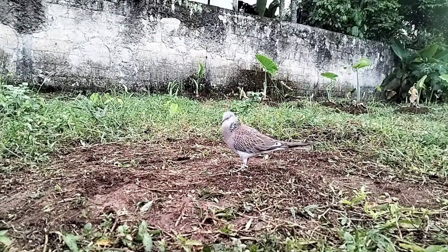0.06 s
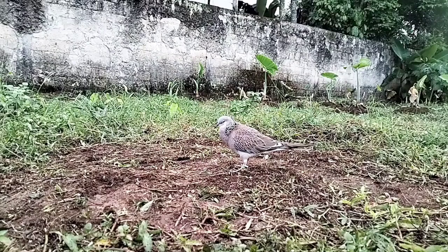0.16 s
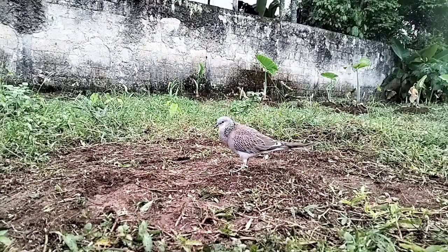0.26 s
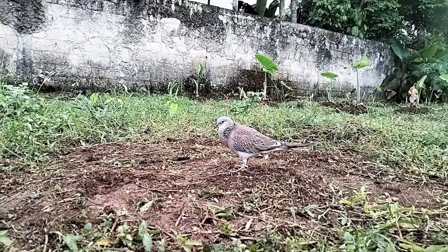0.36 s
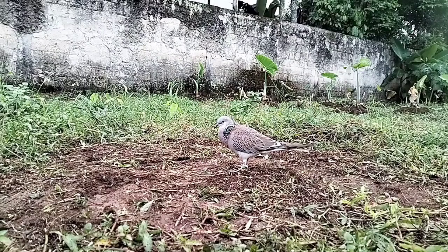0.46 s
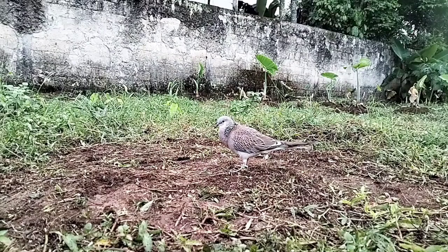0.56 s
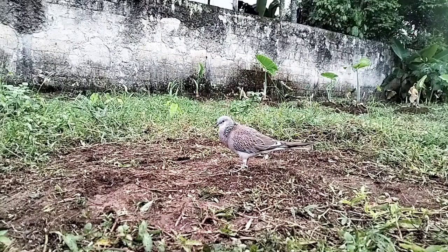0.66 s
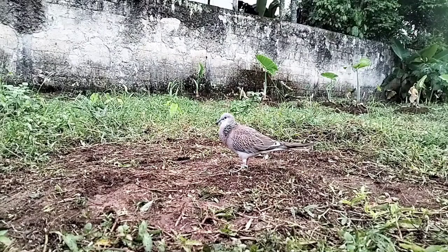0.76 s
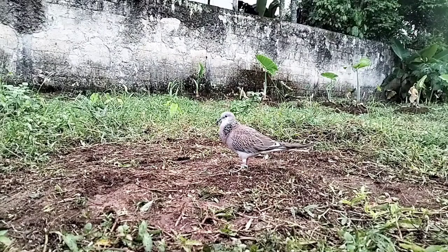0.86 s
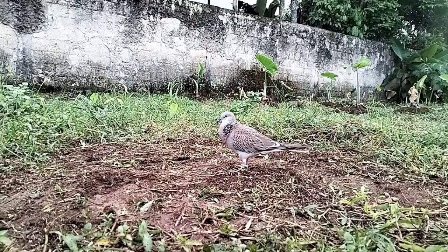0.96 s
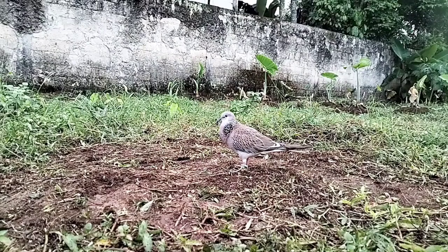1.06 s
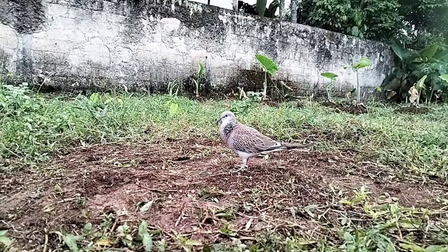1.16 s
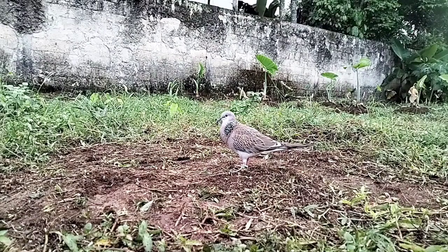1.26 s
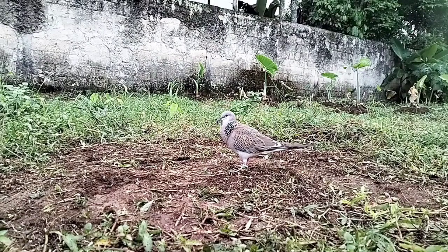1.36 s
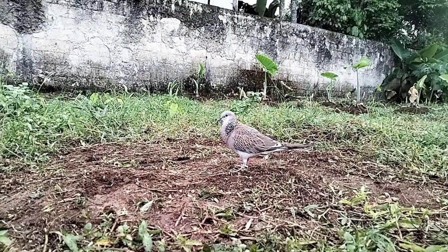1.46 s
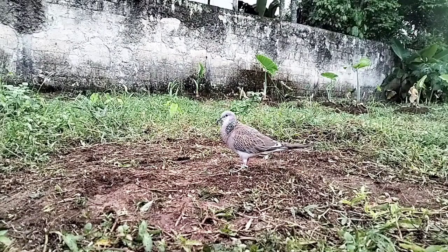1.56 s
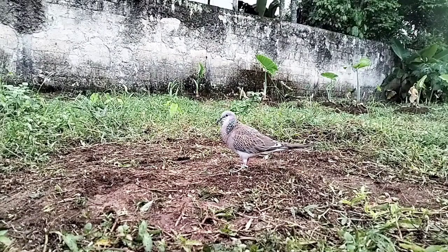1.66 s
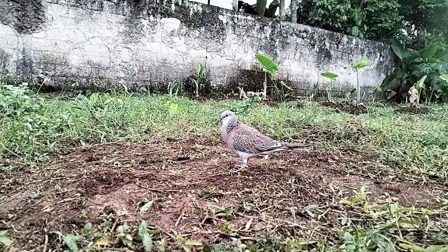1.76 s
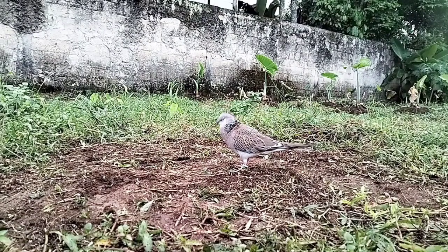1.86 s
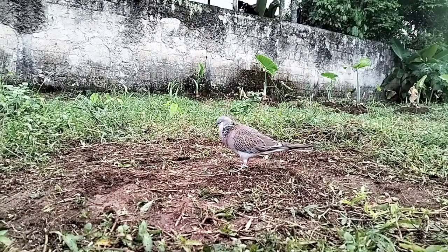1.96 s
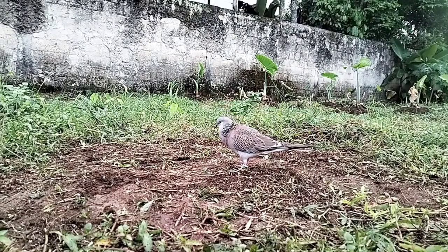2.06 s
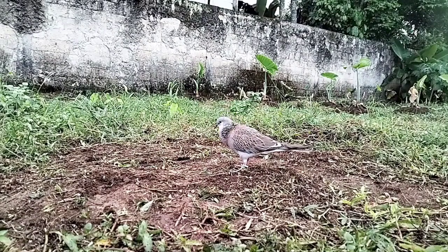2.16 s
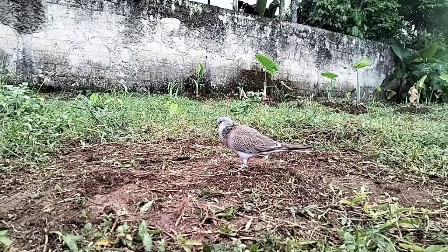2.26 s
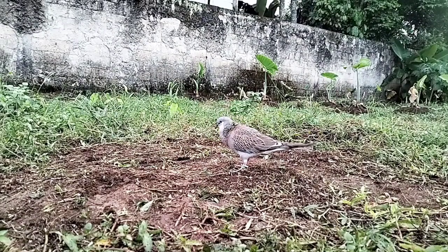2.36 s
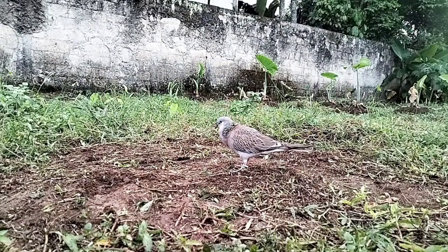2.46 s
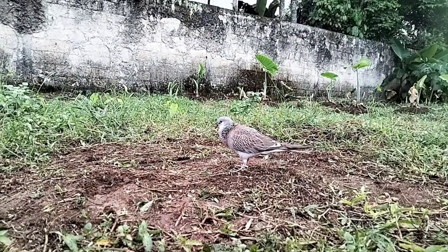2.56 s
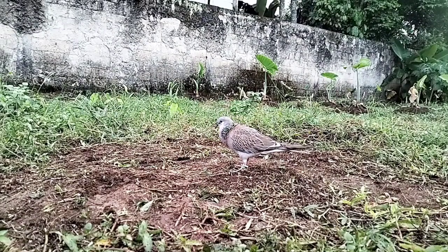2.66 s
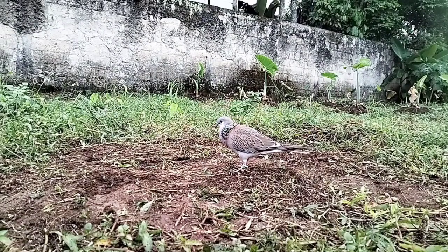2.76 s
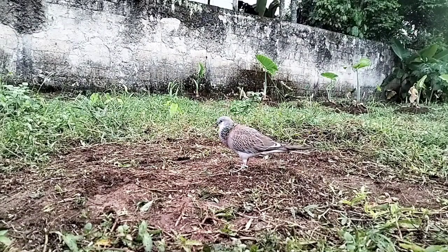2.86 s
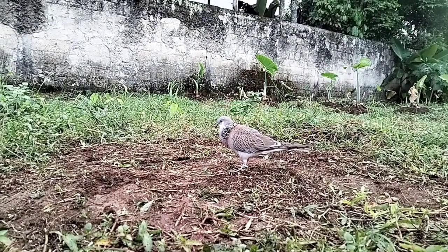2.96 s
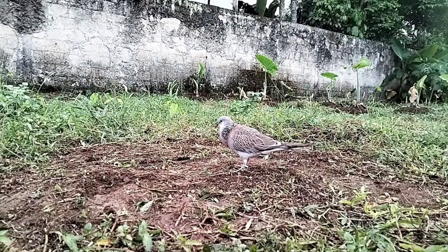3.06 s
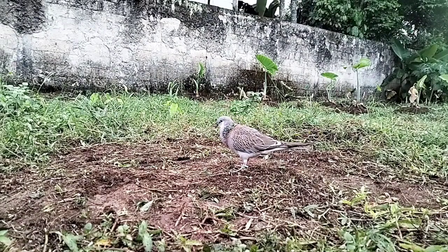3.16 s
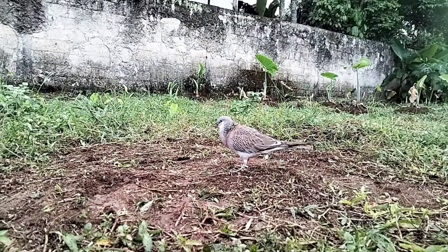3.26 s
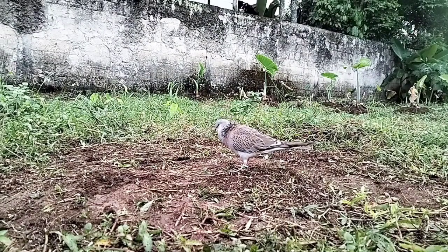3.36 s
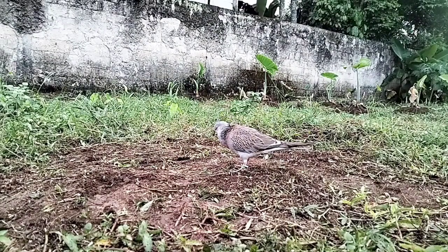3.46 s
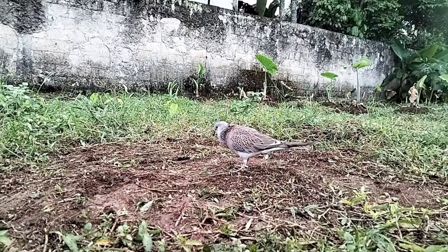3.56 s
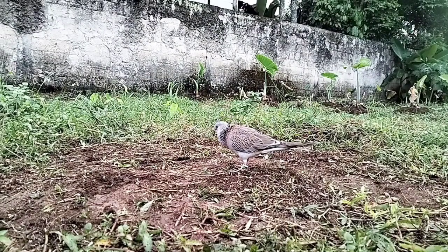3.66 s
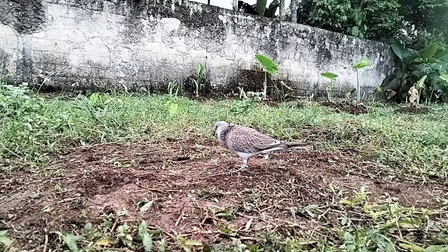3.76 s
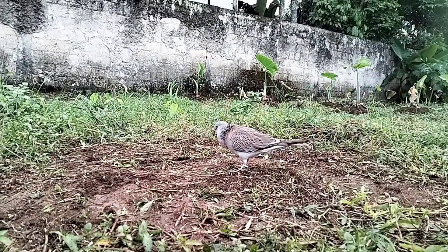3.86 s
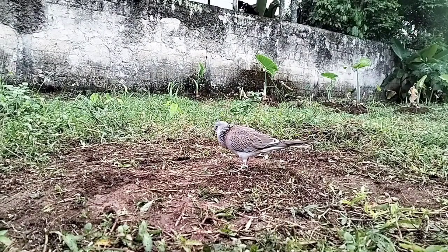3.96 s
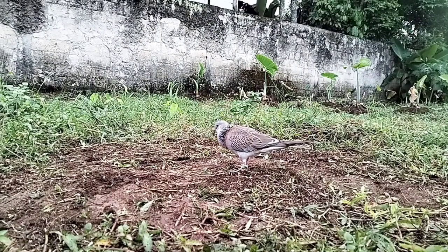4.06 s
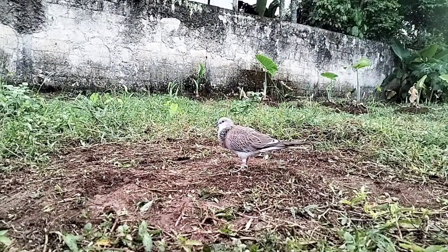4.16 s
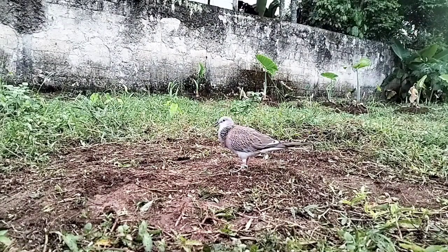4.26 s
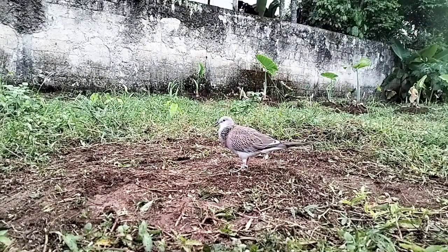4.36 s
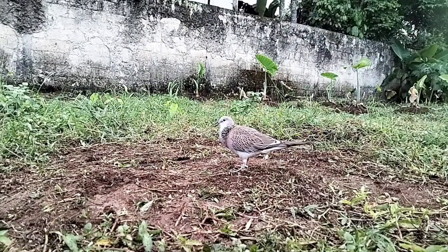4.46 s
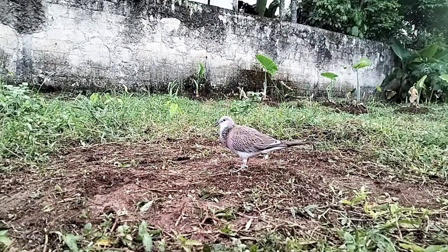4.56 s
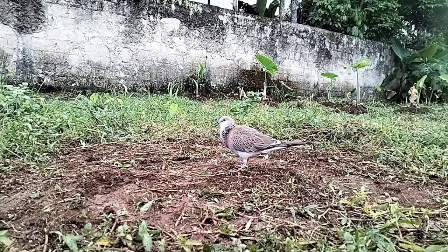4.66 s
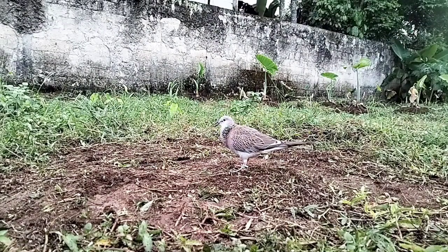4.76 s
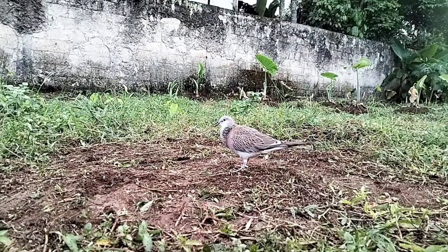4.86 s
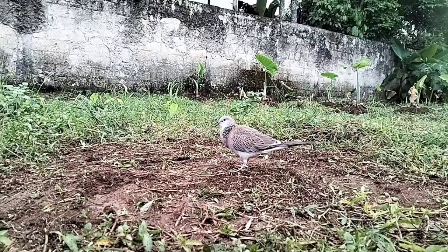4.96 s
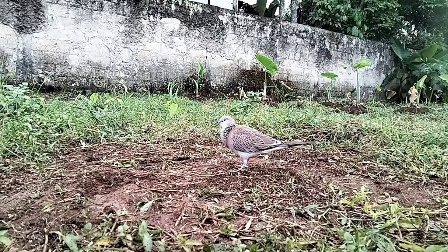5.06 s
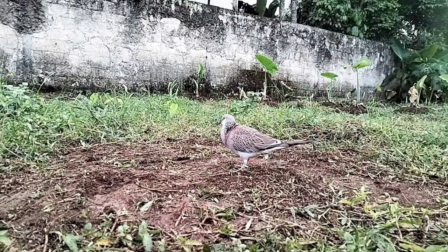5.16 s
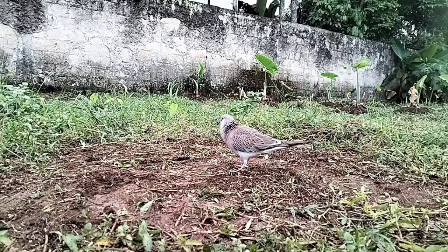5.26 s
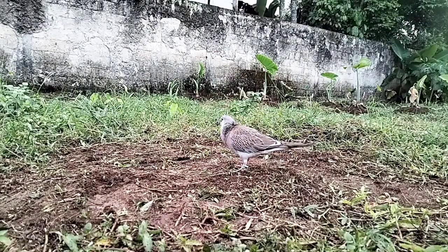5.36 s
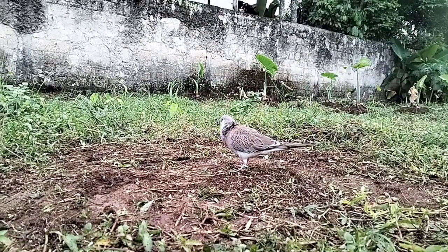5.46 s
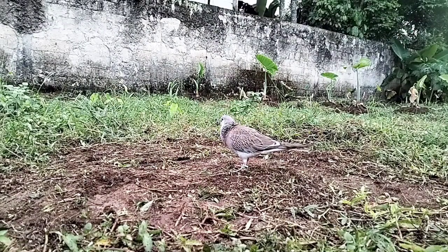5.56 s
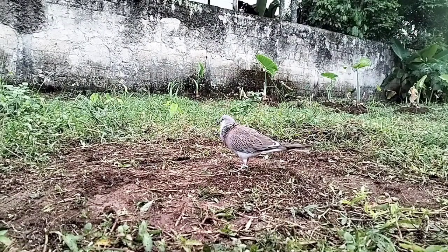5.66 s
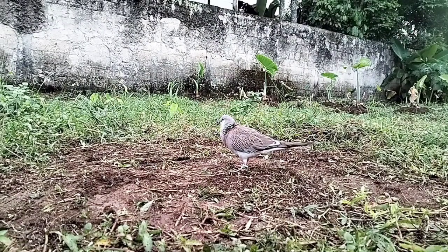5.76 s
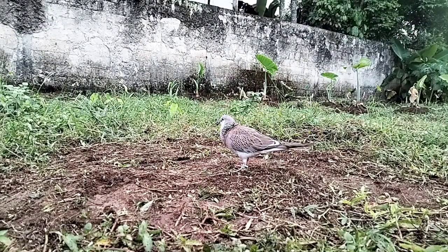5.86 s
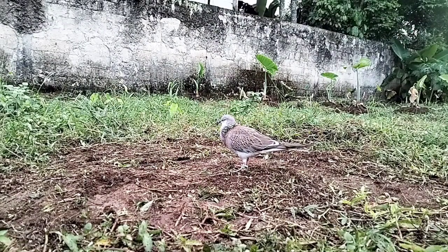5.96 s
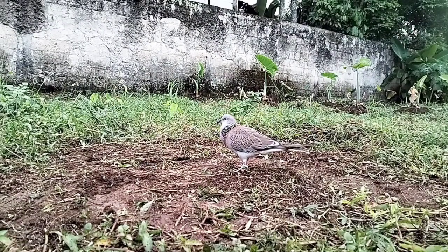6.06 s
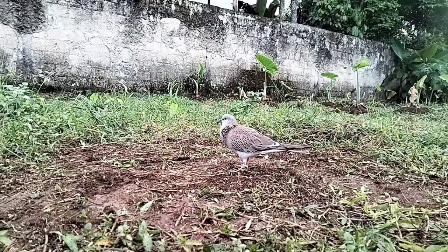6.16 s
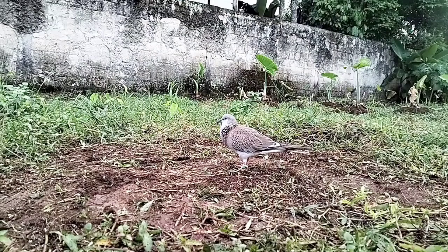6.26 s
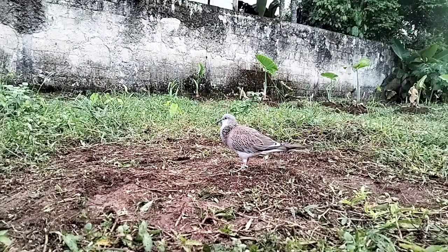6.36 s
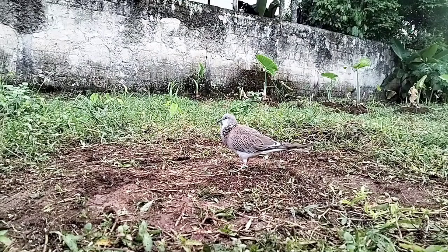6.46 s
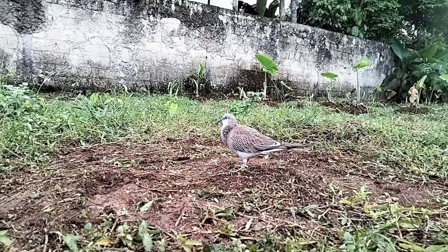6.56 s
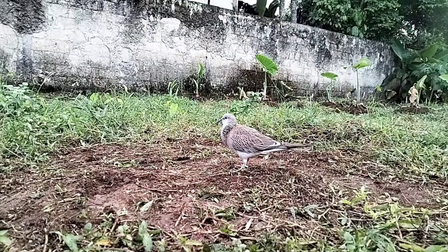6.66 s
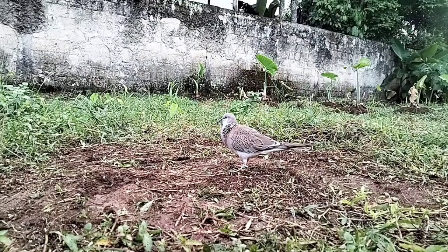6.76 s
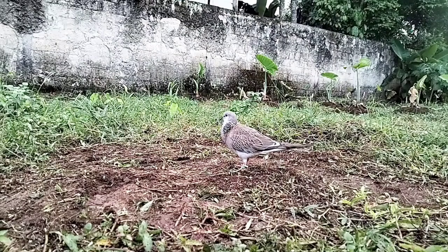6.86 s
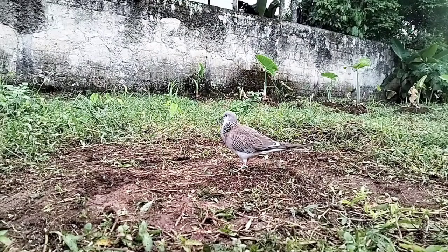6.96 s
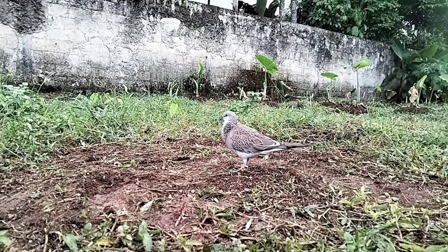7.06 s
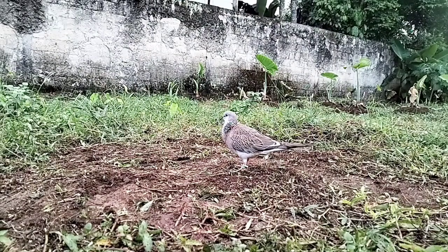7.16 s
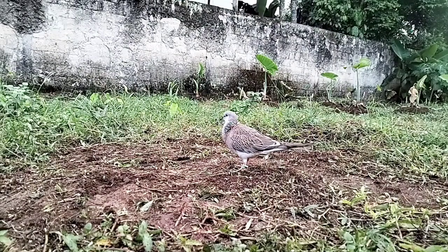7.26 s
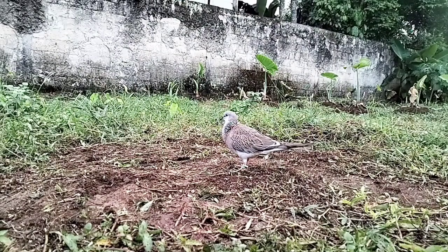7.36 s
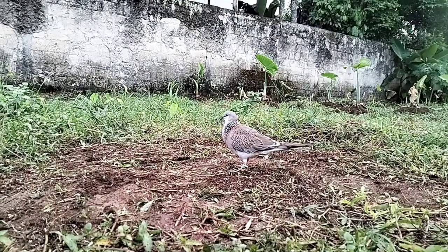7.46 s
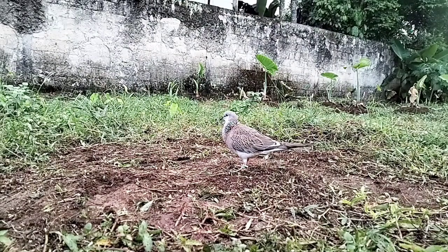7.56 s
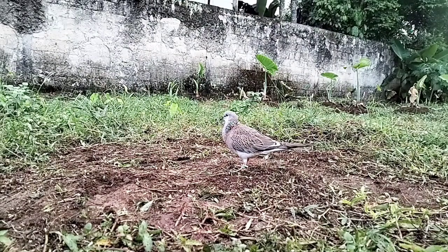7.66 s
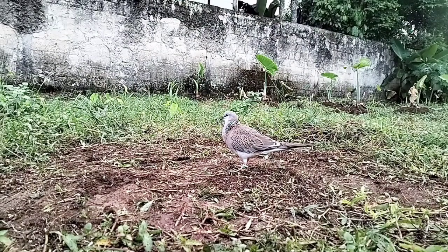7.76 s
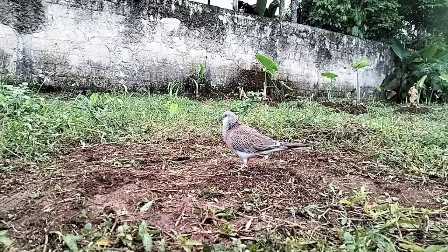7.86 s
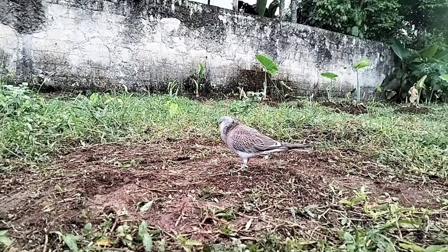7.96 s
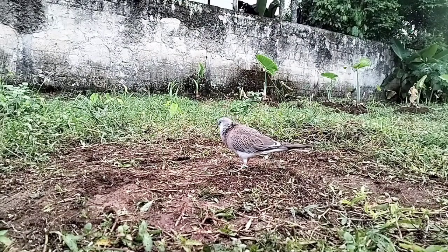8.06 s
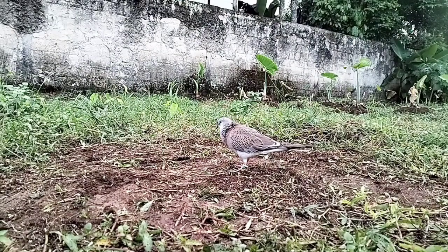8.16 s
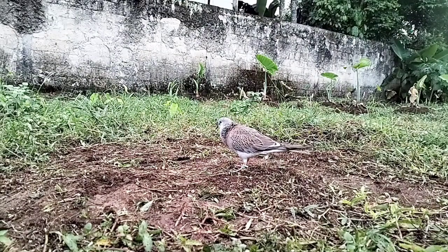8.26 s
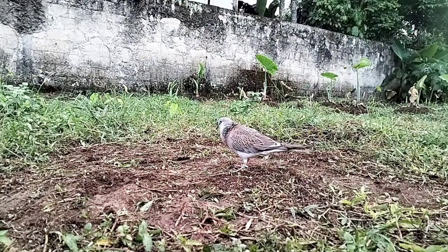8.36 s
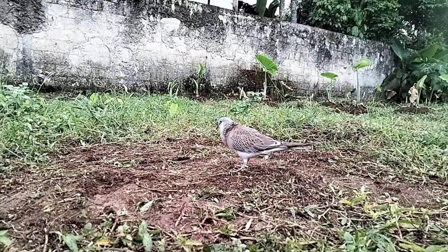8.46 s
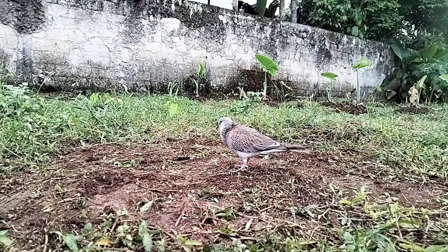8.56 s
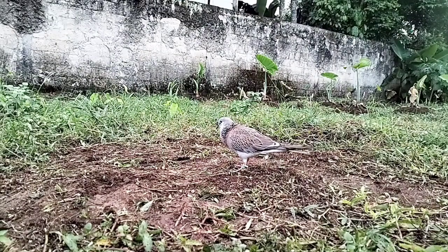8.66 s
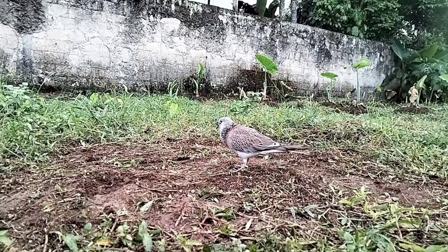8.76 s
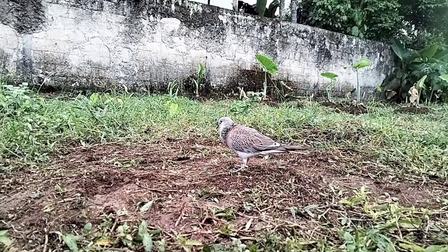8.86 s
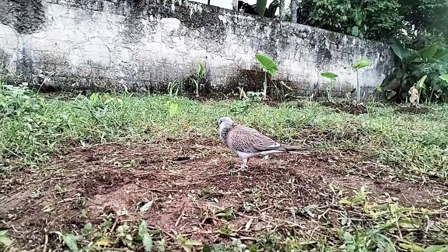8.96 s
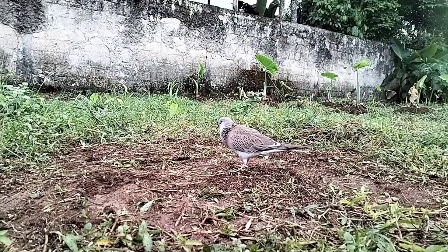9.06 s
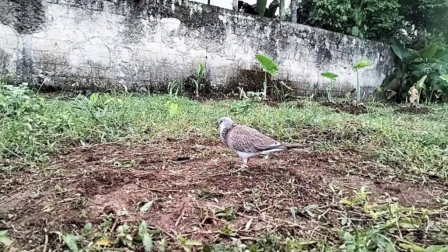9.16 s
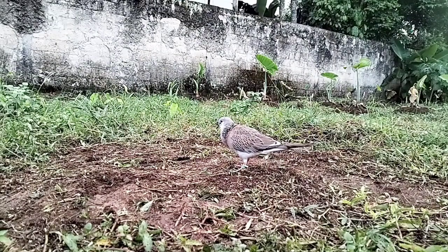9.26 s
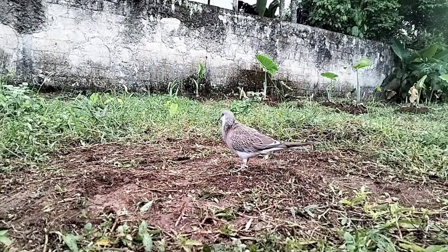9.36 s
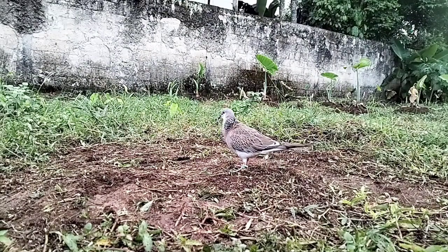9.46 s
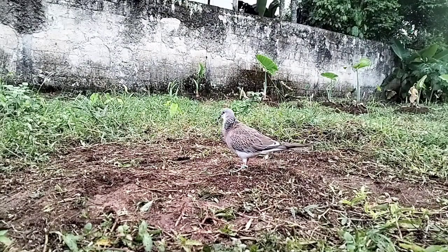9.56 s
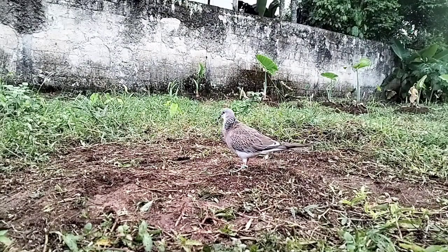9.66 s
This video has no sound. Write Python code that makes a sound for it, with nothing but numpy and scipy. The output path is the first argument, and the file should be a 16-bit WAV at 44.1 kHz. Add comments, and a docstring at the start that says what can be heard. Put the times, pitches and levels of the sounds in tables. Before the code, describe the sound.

A spotted dove close by coos five times, each ending in a rolled purr, while distant doves answer over low traffic rumble.

```python
"""A walled garden: near the microphone a spotted dove on bare ground coos five times, from a swinging syrinx:
a short hoot, a rising coo, then a rolled coo that breaks into ever faster pulses.
Four doves answer from farther off with pulsed tones; small birds chirp and whistle in gliding tones,
a bush cricket buzzes in regular swells of ringing wing strokes, and tiny noise bursts tick.
Behind them, coloured noise makes road rumble, air, leaves and insects; sines make an engine and a motor."""
import sys
import numpy as np
from scipy import signal
from scipy.fft import rfft, irfft, next_fast_len
from scipy.io import wavfile
from scipy.ndimage import uniform_filter1d, map_coordinates

SR = 44100
rng = np.random.default_rng(int(sys.argv[2]) if len(sys.argv) > 2 else 0)


def output_pcm(signal):
    """Save a mono or channel-first signal as 16-bit PCM at the path in sys.argv[1].

    Samples are clipped to [-1, 1] before scaling.
    """
    pcm = np.clip(np.atleast_2d(signal).T, -1, 1) * 32767
    wavfile.write(sys.argv[1], SR, np.round(pcm).astype(np.int16))


N = 427769
TIME = np.arange(N) / SR

# All level_db are nominal, before slow drifts, filters and echoes.
# near dove, opening hoots: start_s, level_db
OPENING_HOOTS = [(.09, -19.5), (1.893, -15.5), (3.378, -15), (5.297, -17), (7.938, -16)]
# near dove, rising coos: start_s, end_s, top_pitch_hz, level_db
RISING_COOS = [(.29, .497, 682.7, -8.5), (2.085, 2.272, 673.4, -8), (3.57, 3.745, 659.3, -9.5),
               (5.495, 5.677, 671.5, -8), (8.145, 8.338, 676.7, -8)]
# near dove, rolled coos: start_s, first_beat_s, slack_kept_per_beat (share), top_pitch_hz, held_loud_s, length_s
ROLLED_COOS = [(.683, 0.053, .796, 739.7, 0.15, .375), (2.463, .049, .7865, 723, 0.18, .407),
               (3.942, 0.045, 0.77, 718, 0.2, 0.4), (5.872, .0492, .76, 722.4, 0.2, .42),
               (8.527, 0.045, .76, 724, 0.2, 0.44)]
# contours of the notes: share_of_length, share_of_top_pitch, level_db
HOOT_CONTOUR = [(0, .78, -22), (.15, .9, -8), (.3, .98, -1), (.42, 1, 0), (.6, .95, -3), (.75, .89, -12),
                (1, .8, -23)]
COO_CONTOUR = [(0, .69, -28), (.15, .75, -16), (.35, .85, -9), (.48, .92, -4.5), (.58, .97, -.5),
               (.75, 1, 0), (.92, .99, 0), (.96, .96, -.5), (.976, .94, -13), (1, .92, -24)]
SYLLABLE_CONTOUR = [(0, .86, -20), (.12, .92, -5), (.24, .96, .3), (.45, 1, -.7), (.72, .98, 0),
                    (.86, .95, -2.5), (1, .92, -19)]
FAR_COO_CONTOUR = [(0, .76, -15), (.3, .88, -8), (.52, .98, -1), (.68, 1, 0), (.88, .95, -1), (1, .82, -13)]
CHIRP_CONTOUR = [(0, .85, -20), (.09, .94, -2), (.24, .76, -6), (.3, .7, -35), (.4, .7, -18), (.5, .88, -4),
                 (.62, 1.02, -9), (.73, .96, 0), (.88, .8, -2), (1, .67, -14)]
# far doves, voices by name: coo_top_hz, roll_first_hz, roll_last_hz, first_pulses_per_s
FAR_VOICES = {"clear": (763, 742, 565, 49.78), "shrill": (780, 800, 657, 51.84),
              "faint": (795, 775, 685, 51.3), "slow": (728, 745, 720, 33.4)}
# far doves, timing by voice: hoot_to_coo_s, coo_length_s, pause_before_roll_s
FAR_TIMING = {"clear": (.19, .137, .22), "shrill": (.25, .17, .21), "faint": (.19, .16, .17),
              "slow": (.24, .175, .21)}
# far doves, songs: coo_start_s, voice (name), hoot_level_db, coo_level_db, roll_level_db
FAR_SONGS = [(-.46, "shrill", -33, -33, -30.5), (1.05, "faint", -37, -35, -37),
             (1.62, "clear", -30.5, -24.5, -27), (2.05, "shrill", -30, -31, -30.5),
             (3.41, "faint", -33, -35.5, -37), (3.88, "slow", -35.5, -28.5, -29),
             (4.16, "clear", -31, -24, -28), (4.32, "shrill", -29.5, -37.5, -32.5),
             (5.665, "faint", -32.5, -34.5, -30.5), (6.87, "slow", -40.5, -33.5, -29),
             (6.99, "clear", -30, -24, -27), (7.23, "shrill", -40, -32.5, -31),
             (8.14, "faint", -35.5, -34, -32.5), (9.41, "slow", -37.5, -32, -32),
             (9.80, "clear", -38, -24, -25)]
# small bird, double chirps: start_s, level_db
DOUBLE_CHIRPS = [(.827, -46), (1.603, -46), (3.126, -45.5), (3.836, -45), (5.80, -48), (7.887, -46.5),
                 (8.542, -46)]
# distant birds, thin whistles: start_s, end_s, first_hz, last_hz, level_db
THIN_WHISTLES = [(0.568, 0.871, 4540, 4240, -56.5), (1.27, 1.763, 4450, 4040, -63.5),
                 (2.928, 3.162, 4240, 4400, -61), (3.559, 3.917, 4220, 4140, -60),
                 (4.31, 4.46, 4600, 4470, -66), (5.482, 5.867, 4260, 4080, -64),
                 (6.37, 6.635, 1017, 1044, -51), (7.663, 7.97, 4210, 4290, -60),
                 (8.164, 8.523, 4290, 4215, -60)]
# faint ticks: time_s, level_db
TICKS = [(.9199, -43), (1.3878, -45), (2.4733, -43), (6.1435, -46), (6.2557, -43), (7.2894, -47),
         (8.9326, -42)]
# road rumble, before its trim: time_s, level_db
ROAD_LEVEL = [(0.0, -28.5), (2.13, -25.5), (6.02, -25), (6.18, -26), (9.54, -24.5), (9.7, -26.5)]
# distant engine: time_s, level_db
ENGINE_LEVEL = [(0, -34.5), (1.9, -39.5), (2.4, -31), (6.1, -29.5), (6.6, -39), (7.4, -33), (9.7, -38)]
# engine orders: multiple_of_firing_rate, level_db
ENGINE_ORDERS = [(2, -1.5), (3, -10.5), (4, -9), (5, -7.5)]
# a far motor speeds up, then drops back: time_s, pitch_hz, level_db
MOTOR_PASS = [(0, 140, -70), (6.9, 137.2, -44), (7.7, 148.2, -31.5), (9.1, 167.9, -33), (9.4, 130, -30),
              (9.7, 136, -25.5)]
# leaf hiss, before its trim: time_s, level_db
LEAF_HISS = [(0.0, -57), (0.78, -63), (1.05, -55.5), (1.81, -54), (4.38, -60.5), (6.1, -55.5),
             (6.46, -58.5), (7.7, -61), (8.7, -59.5), (9.7, -63.5)]
# noise colours, relative: frequency_hz, density_db (per Hz)
TRAFFIC_COLOUR = [(20, -20.5), (32, -4.5), (48, -9.5), (62, 0.5), (100, 0.5), (130, 1.5), (175, 0.5),
                  (215, -5.5), (260, -12), (335, -11.5), (400, -18.5), (480, -25.5)]
AIR_COLOUR = [(300, -6), (430, 0.5), (600, 6), (800, -1), (1000, -5.5), (1400, -13), (1900, -23),
              (3000, -31.5), (6000, -40.5), (9000, -37.5), (12000, -44.5), (16000, -47.5)]
LEAF_COLOUR = [(1200, -23.5), (2000, -4), (2800, 6.5), (3300, 5), (4100, 6), (4800, -3), (6200, -6),
               (8500, -23.5), (12000, -42)]
CHORUS_COLOUR = [(6500, -31), (6900, -4), (7200, 2.5), (7600, -4.5), (8100, -9.5), (9000, -17.5),
                 (9700, -7.5), (10200, -1.5), (10700, -6.5), (11500, -27.5)]

# near dove
HOOT_S, HOOT_HZ = .09, 564  # the length also serves the far doves; the pitch is the hoot's top
FASTEST_BEAT_S = .014  # the beats of a roll shrink towards this
FIRST_GAP_S, GAP_KEEPS, LEAST_GAP_S = .017, .27, .0035  # the silence between syllables closes up quickly
THIRD_EARLY_S = .0035  # the third syllable catches a little early
ROLL_DB, ROLL_FADE_DB_PER_S = -9.5, 91
ROLL_LAST_HZ, ROLL_BEND = 458, 1.7  # the pitch sinks, slowly at first
# far doves
FAR_HOOT_PITCH = .88  # share of the coo's top pitch
FAR_ROLL_S = .45
# small bird and cricket
CHIRP_S, CHIRP_HZ = .083, 3693
FIRST_BUZZ_END_S, BUZZ_EVERY_S, BUZZ_S = .728, 1.125, .55
STROKES_PER_S, BUZZ_DB = 158.8, -54
# microphone
CUTOFF_HZ = 15800


def from_db(db):
    """Decibels to amplitude."""
    return 10 ** (np.asarray(db) / 20)


def rms_one(x):
    """Scale to an rms of 1."""
    return x / np.sqrt(np.mean(x ** 2) + 1e-20)


def along(rows, at):
    """The columns of a table, joined by straight lines."""
    first, *columns = np.transpose(rows)
    return [np.interp(at, first, c) for c in columns]


def drift(rate, size=N):
    """Smooth chance of spread about 1 that changes about rate times a second."""
    knots = rng.standard_normal(size // 20 + 8)
    places = np.arange(size) * min(rate / SR, 1 / 20) + 2
    return map_coordinates(knots, [places], order=2, mode="mirror")


def sine(hz):
    """A pure tone that follows a moving pitch."""
    return np.sin(2 * np.pi * np.cumsum(hz) / SR)


def noise(spectrum):
    """Steady noise of a given colour, falling away outside it; rms 1."""
    hz, db = np.transpose(spectrum)
    size = next_fast_len(N)
    bins = np.maximum(np.fft.rfftfreq(size, 1 / SR), 1)
    gain = from_db(np.interp(np.log(bins), np.log(hz), db))
    gain *= np.minimum(1, bins / hz[0]) ** 2 * np.minimum(1, hz[-1] / bins) ** 6
    return rms_one(irfft(rfft(rng.standard_normal(size)) * gain, size)[:N])


def band(x, low_hz, high_hz):
    """Pass what lies between two frequencies."""
    sos = signal.butter(2, [low_hz, min(high_hz, .45 * SR)], "band", fs=SR, output="sos")
    return signal.sosfilt(sos, x + 1e-18)


def progress(start, end):
    """Runs from 0 to 1 over a note."""
    return np.linspace(0, 1, max(int((end - start) * SR), 200))


def add(out, start, sound):
    """Lay a sound in at its time, its ends rounded over a millisecond or two."""
    at = int(start * SR)
    rounded = sound * signal.windows.tukey(len(sound), min(140 / len(sound), 1))
    heard, at = rounded[max(-at, 0):], max(at, 0)
    out[at:at + len(heard)] += heard[:max(N - at, 0)]


def notes(rows, shape, waver, shimmer_db, frailty=0):
    """Nearly pure notes on one contour of pitch and level; frailty changes the tremble where they are soft."""
    out = np.zeros(N)
    for start, end, hz, db in rows:
        u = progress(start, end)
        ratio, swell_db = along(shape, u)
        tremble = (-.5 + frailty * np.tanh(np.abs(swell_db) / 8)) * drift(140, size=len(u))
        level = uniform_filter1d(from_db(db + swell_db + shimmer_db * tremble), size=90)
        add(out, start, level * sine(hz * ratio * (1 + waver * tremble)))
    return out


def rolls(rows, bend, fade_db, quicken, arch, uneven_db, sharpness, slip):
    """The syrinx opens and shuts ever faster as pitch and level sink; each pulse is a little arch of pitch."""
    out = np.zeros(N)
    for start, end, first_hz, last_hz, db, per_s in rows:
        u = progress(start, end)
        pulse_rate = per_s * (1 + quicken * u) * (1 + .08 * drift(40, size=len(u)))
        pulses = np.cumsum(pulse_rate) / SR
        opening = np.abs(np.sin(np.pi * pulses))
        # the pitch slips each time the syrinx shuts, so no pulse is in step with the last
        stray = slip * (1 - opening) * drift(160, size=len(u))
        sinking_hz = first_hz + (last_hz - first_hz) * u ** bend
        hz = sinking_hz * (1 + arch * (opening - .85) + stray)
        level = from_db(db - fade_db * u ** bend + uneven_db * drift(40, size=len(u)))
        pulsing = uniform_filter1d(opening ** sharpness, size=90)
        add(out, start, level * pulsing * sine(hz))
    return out


def garden(x, t60, wall_s, wall_db, scatter_db):
    """One echo from the wall or the ground, and a thin tail scattered by the plants."""
    t = np.arange(SR // 2) / SR
    tail = rng.standard_normal(len(t)) * from_db(-60 * t / t60) * np.minimum(t / .02, 1)
    response = from_db(scatter_db) * tail / np.sqrt(np.sum(tail ** 2))
    response[0] += 1  # direct sound
    response[int(np.clip(wall_s, 0, .4) * SR)] += from_db(wall_db)
    return x + signal.fftconvolve(x, response)[:N]


def near_dove(octave_db=-55, whistle_db=-65, loudest=.35):
    """The syrinx swings within a limit; the crop passes the fundamental, a trace of octave and a high overtone."""
    hoots = [(s, s + HOOT_S, HOOT_HZ, db) for s, db in OPENING_HOOTS]
    syllables, flutters = roll_parts()
    voice = notes(hoots, HOOT_CONTOUR, waver=.016, shimmer_db=1.1, frailty=1.2)
    voice += notes(RISING_COOS, COO_CONTOUR, waver=.009, shimmer_db=.7, frailty=3.0)
    voice += notes(syllables, SYLLABLE_CONTOUR, waver=.006, shimmer_db=.7)
    voice += rolls(flutters, bend=.95, fade_db=15, quicken=.15, arch=.1, uneven_db=2.2, sharpness=1.4, slip=.13)
    analytic = signal.hilbert(voice, next_fast_len(N))[:N]
    level, phase = np.abs(analytic), np.angle(analytic)
    swing = level / (1 + (level / loudest) ** 12) ** (1 / 12)
    effort = swing / loudest
    # the octave shows most in the soft, low parts of a note
    octave = np.tanh(level / .08) * (1 - .7 * effort) * np.cos(2 * phase) * from_db(3 * drift(110))
    # the seventh and eighth partials whistle through mostly at full effort
    partials = band(np.cos(7 * phase) + np.cos(8 * phase), 5050, 5480)
    whistle = effort ** 3 * from_db(3 * drift(90)) * partials
    fundamental = band(swing * np.cos(phase), 270, 1250)
    voice = fundamental + from_db(octave_db) * octave + from_db(whistle_db) * whistle
    return garden(voice, t60=.38, wall_s=.006, wall_db=-24, scatter_db=-18)


def roll_parts(count=8):
    """Each roll opens with syllables that come ever faster, sink and fade, until they run into a flutter."""
    syllables, flutters, k = [], [], np.arange(count + 1)
    for start, first_beat, keeps, top_hz, hold, length in ROLLED_COOS:
        beat = FASTEST_BEAT_S + (first_beat - FASTEST_BEAT_S) * keeps ** k
        t = np.cumsum(beat) - beat
        end = t + beat - LEAST_GAP_S - FIRST_GAP_S * GAP_KEEPS ** k
        hz = top_hz + (ROLL_LAST_HZ - top_hz) * (t / length) ** ROLL_BEND
        db = ROLL_DB - ROLL_FADE_DB_PER_S * np.maximum(t - hold, 0)
        t = t - THIRD_EARLY_S * (k == 2)
        # no two syllables are held equally long or pressed equally hard
        chance = rng.standard_normal((count + 1, 2))
        end = end + .0012 * chance[:, 0]
        db = db + .9 * chance[:, 1]
        syllables += list(zip(start + t, start + end, hz, db))[:-1]
        flutters.append((start + t[-1], start + length, hz[-1], ROLL_LAST_HZ, db[-1], 1 / beat[-1]))
    return syllables, flutters


def far_doves():
    """Four doves on other perches sing hoot, coo and roll in their own voices; the rolls blur among the trees."""
    hoots, coos, purrs = [], [], []
    for s, name, hoot_db, coo_db, roll_db in FAR_SONGS:
        hz, first_hz, last_hz, per_s = FAR_VOICES[name]
        lead, length, pause = FAR_TIMING[name]
        roll_s = s + length + pause
        hoots.append((s - lead, s - lead + HOOT_S, hz * FAR_HOOT_PITCH, hoot_db))
        coos.append((s, s + length, hz, coo_db))
        purrs.append((roll_s, roll_s + FAR_ROLL_S, first_hz, last_hz, roll_db, per_s))
    songs = notes(hoots, HOOT_CONTOUR, waver=.008, shimmer_db=2.5)
    songs += notes(coos, FAR_COO_CONTOUR, waver=.0031, shimmer_db=2.9)
    songs += rolls(purrs, bend=1.8, fade_db=7, quicken=.55, arch=.12, uneven_db=1.2, sharpness=1.3, slip=.09)
    return garden(songs, t60=.45, wall_s=.025, wall_db=-17, scatter_db=-9)


def small_birds(flicker_db=4, waver=.008):
    """Quick double chirps, and thin gliding whistles that flicker through the trees."""
    whistles = np.zeros(N)
    for start, end, first_hz, last_hz, db in THIN_WHISTLES:
        u = progress(start, end)
        hz = (first_hz + (last_hz - first_hz) * u) * (1 + waver * drift(200, size=len(u)))
        level = from_db(db + flicker_db * np.tanh(drift(80, size=len(u))))
        add(whistles, start, level * np.sin(np.pi * u) * sine(hz))
    chirp_rows = [(s, s + CHIRP_S, CHIRP_HZ, db) for s, db in DOUBLE_CHIRPS]
    chirps = notes(chirp_rows, CHIRP_CONTOUR, waver=.01, shimmer_db=1.1)
    return garden(chirps + whistles, t60=.17, wall_s=.012, wall_db=-18.5, scatter_db=-4.5)


def cricket(ring_hz=7540, sag_hz=500, swell_db=12, octave_db=-32, ragged_db=1.0):
    """Each wing stroke rings the wing, falling slightly; steadily paced buzzes swell and stop dead."""
    strokes = np.cumsum(STROKES_PER_S * (1 + .0066 * drift(5.5))) / SR
    through = strokes % 1
    # no stroke is in step with the last
    stroke_offset = rng.random(N)[strokes.astype(int)]
    phase = 2 * np.pi * (np.cumsum(ring_hz + sag_hz * (.5 - through)) / SR + stroke_offset)
    ringing = np.sin(phase) + from_db(octave_db) * np.sin(2 * phase)
    buzz = rms_one(np.sin(np.pi * through) ** 2 * ringing)
    level = np.zeros(N)
    for end in np.arange(FIRST_BUZZ_END_S, N / SR + BUZZ_S, BUZZ_EVERY_S):
        u = progress(end - BUZZ_S, end)
        add(level, end - BUZZ_S, from_db(BUZZ_DB - swell_db * (1 - u) ** 2))
    return level * from_db(ragged_db * drift(110)) * buzz


def ticks():
    """Tiny dry cracks: noise bursts that fall 40 dB in 13 ms."""
    out = np.zeros(N)
    for s, db in TICKS:
        u = progress(s, s + .013)
        add(out, s - .001, from_db(db - 40 * u) * rng.standard_normal(len(u)))
    return band(out, 2500, 15000)


def traffic(firing_hz=32.72, rumble_db=-.18, upper_db=-3):
    """Road rumble, an engine's wavering hum and the fifth and sixth orders of a motor going by."""
    road_db, = along(ROAD_LEVEL, TIME)
    rumble = from_db(road_db + rumble_db) * noise(TRAFFIC_COLOUR)
    firing = firing_hz * (1 + .012 * drift(3.6))
    hum = sum(from_db(db + 2.5 * drift(8)) * sine(k * firing) for k, db in ENGINE_ORDERS)
    hum_db, = along(ENGINE_LEVEL, TIME)
    pass_hz, pass_db = along(MOTOR_PASS, TIME)
    pass_hz = pass_hz * (1 + .008 * drift(25))
    lower, upper = sine(pass_hz), sine(pass_hz * 6 / 5)
    motor = from_db(pass_db + 2.8 * drift(12)) * (lower + from_db(upper_db) * upper)
    return rumble + np.sqrt(2) * (from_db(hum_db) * hum + motor)  # root 2 gives a sine an rms of 1


def surroundings(air_db=-43, leaves_db=.7, chorus_db=-64):
    """Open air, hissing leaves and a steady chorus of insects, all coloured noise."""
    hiss_db, = along(LEAF_HISS, TIME)
    air = from_db(air_db + 1.0 * drift(4.6)) * noise(AIR_COLOUR)
    leaves = from_db(hiss_db + leaves_db + .64 * drift(16)) * noise(LEAF_COLOUR)
    chorus = from_db(chorus_db + 1.5 * drift(160)) * noise(CHORUS_COLOUR)
    return air + leaves + chorus


def scene():
    """The garden from the nearest dove to the open air, on one channel."""
    birds = near_dove() + far_doves() + small_birds()
    return (birds + cricket() + ticks() + traffic() + surroundings())[None]


def record(dry):
    """One microphone: the ends are eased and the top is cut steeply."""
    eased = dry * signal.windows.tukey(N, .002)
    top_cut = signal.ellip(10, .1, 90, CUTOFF_HZ, fs=SR, output="sos")
    return signal.sosfilt(top_cut, eased)


dry = scene()
out = record(dry)
output_pcm(out)
```